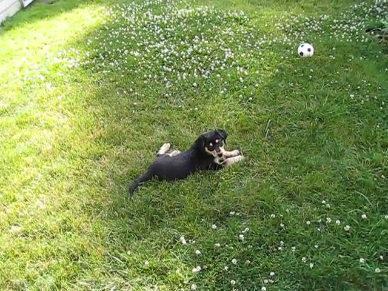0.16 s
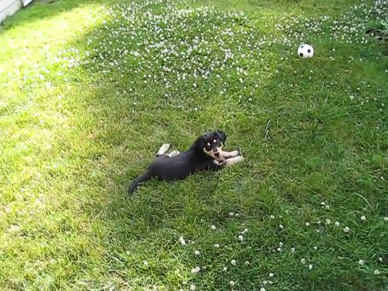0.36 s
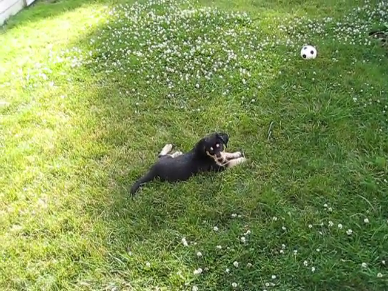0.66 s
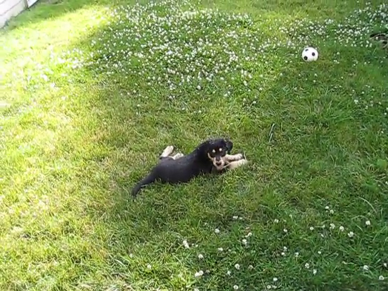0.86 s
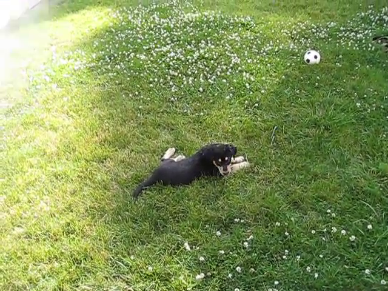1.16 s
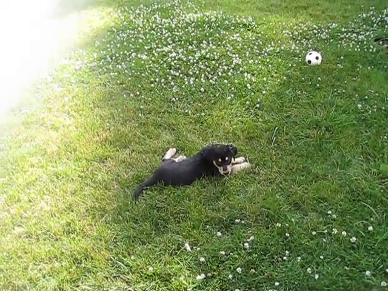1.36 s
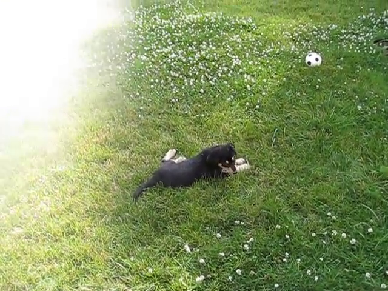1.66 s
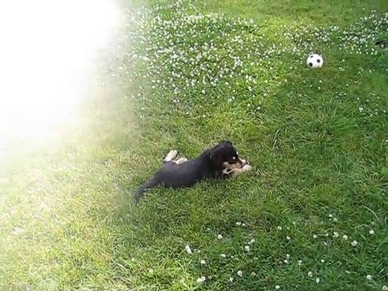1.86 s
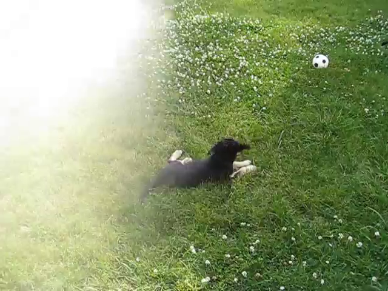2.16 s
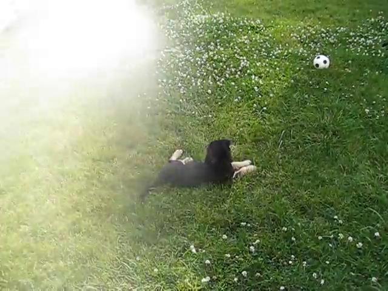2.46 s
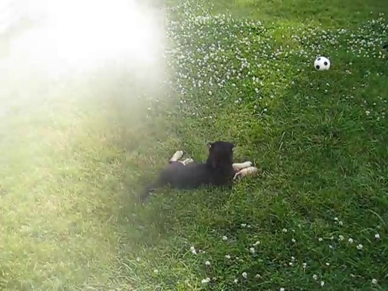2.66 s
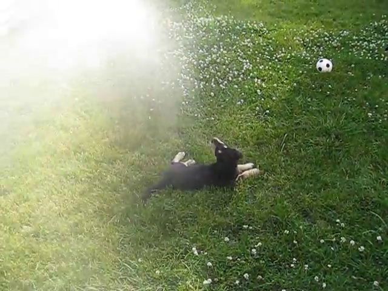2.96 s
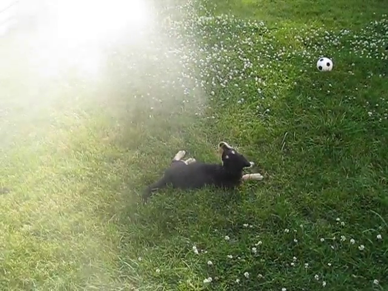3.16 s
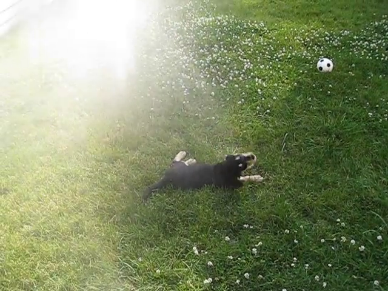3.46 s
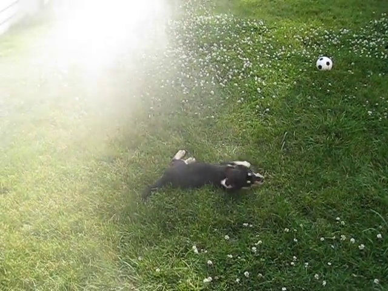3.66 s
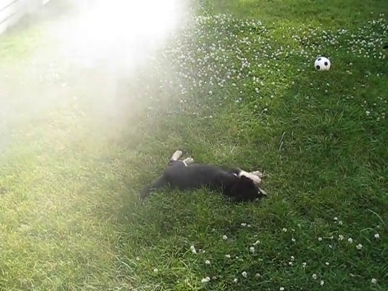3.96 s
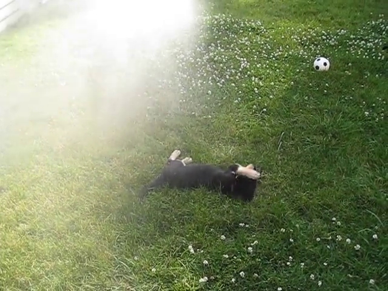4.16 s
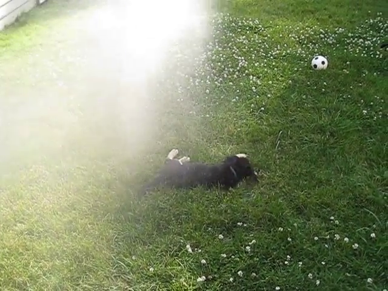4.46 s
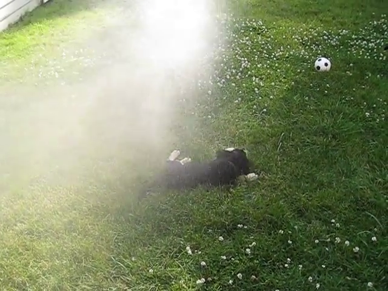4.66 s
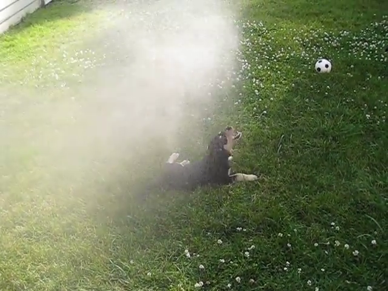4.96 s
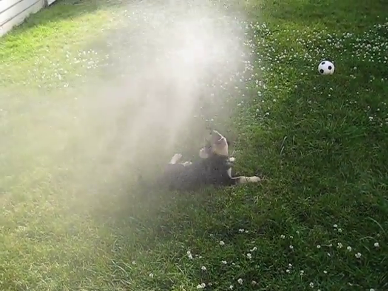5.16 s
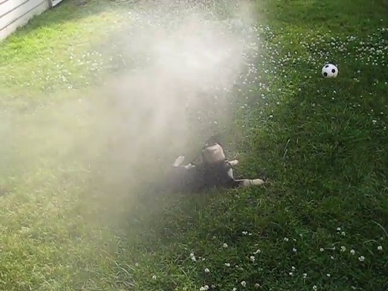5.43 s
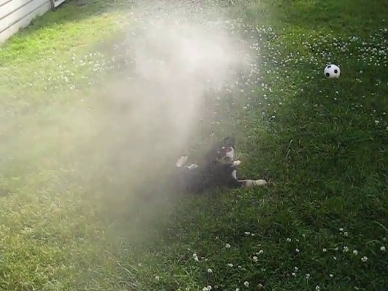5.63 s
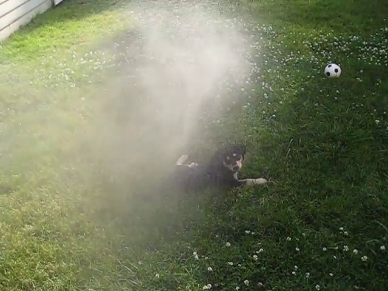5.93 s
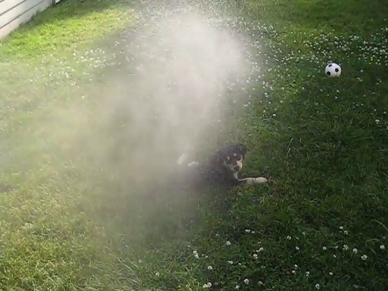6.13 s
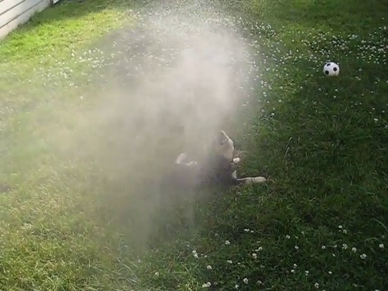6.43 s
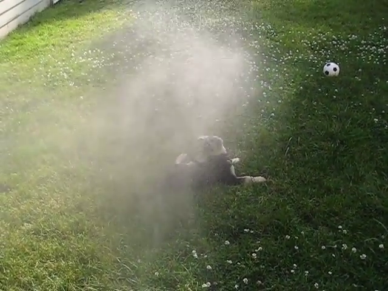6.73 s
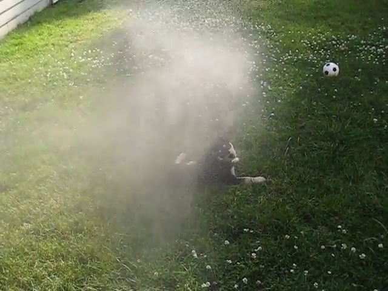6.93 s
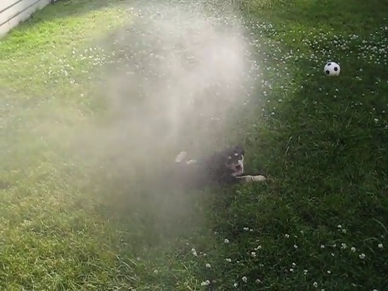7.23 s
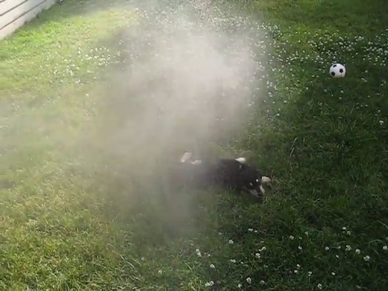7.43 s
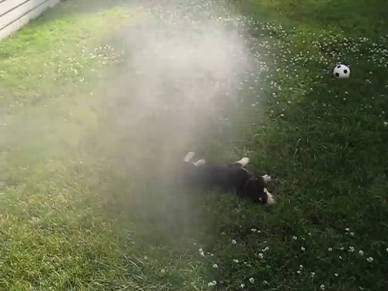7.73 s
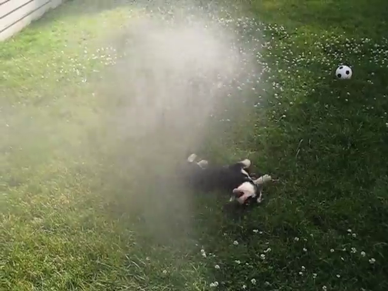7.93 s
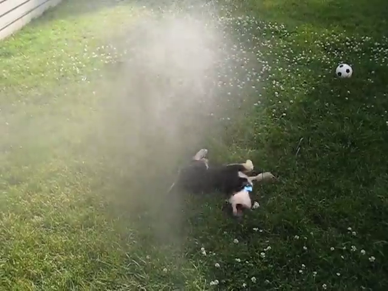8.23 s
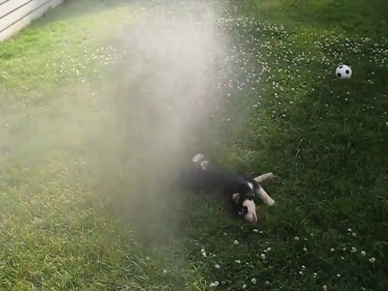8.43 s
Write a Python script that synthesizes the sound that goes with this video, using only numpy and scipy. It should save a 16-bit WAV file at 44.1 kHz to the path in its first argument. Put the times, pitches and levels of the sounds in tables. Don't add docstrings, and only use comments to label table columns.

```python
import sys
import numpy as np
from scipy import signal
from scipy.fft import rfft, irfft
from scipy.io import wavfile

SR = 44100
rng = np.random.default_rng(int(sys.argv[2]) if len(sys.argv) > 2 else 0)


def field_ratio(decibels):
    return 10 ** (np.asarray(decibels, dtype=float) / 20)


def waveform_to_disk(signal):
    frames = np.transpose(np.atleast_2d(signal))
    scaled = np.clip(frames, -1, 1) * 32767
    samples = np.round(scaled).astype(np.int16)
    wavfile.write(sys.argv[1], SR, samples)


N = 378819


def curves(rows):
    s, *columns = np.transpose(rows)
    return [np.interp(np.arange(N) / SR, s, column) for column in columns]


def rms_one(x):
    return x / np.sqrt(np.mean(x ** 2) + 1e-20)


def drift(rate_hz):
    r = np.exp(-80 * np.pi * rate_hz / SR)
    settle = 2000
    noise = rng.standard_normal(N // 40 + settle + 2)
    slow = signal.lfilter([1], [1, -2 * r, r * r], noise)[settle:]
    return np.interp(np.arange(N) / 40, np.arange(len(slow)), rms_one(slow))


def resonate(x, hz, width_hz):
    r = np.exp(-np.pi * width_hz / SR)
    section = [1 - r * r, 0, r * r - 1, 1, -2 * r * np.cos(2 * np.pi * hz / SR), r * r]
    return signal.sosfilt([section, section, section], x)


def jet():
    # t/s, bearing (0 far aside - 3 straight ahead), nearness/dB
    swing = [(0, .01, 1.5), (.3, .1, 1.5), (.8, 0.8, 2.0), (1.3, 1.8, 0.5), (1.8, 2.28, 0.3),
             (2.2, 2.36, 0.5), (3, 2.32, .5), (3.8, 2.47, 0.7), (4.4, 2.83, 0.1), (5.2, 2.9, 0.4),
             (6.4, 2.9, 0.44), (6.8, 2.98, 0.05), (7.6, 2.73, 0.6), (8.6, 2.85, 1.0)]
    # f/Hz, width/Hz, rms level/dB at bearing 0, 1, 2, 3
    resonances = [(266, 506, -57.5, -56.5, -56, -54), (636, 630, -51.7, -53, -50, -50),
                  (1023.5, 384, -42.5, -44, -40, -39), (1501, 537, -37.5, -38, -36, -34),
                  (1826, 600, -46, -45.5, -41.5, -42.5), (2405, 410, -44, -44.5, -41.5, -40.5),
                  (2760, 770, -42.5, -39, -37, -36.5), (3149, 800, -41, -38.5, -36, -33),
                  (3707, 1190, -42, -42, -38, -34), (4324, 740, -47, -40, -37.5, -38.5),
                  (4670, 1600, -38, -40, -45.5, -51), (5050, 750, -48, -43, -37, -35.0),
                  (5350, 460, -50, -42.5, -39.5, -43), (5640, 740, -44, -55, -50, -55.5),
                  (6290, 1000, -58.1, -55, -52.5, -48.5), (6764, 1010, -46, -45, -40.5, -35.5),
            (7380, 1220, -62.2, -48, -41, -34.5), (7790, 920, -52, -49, -42.5, -44.5),
            (8250, 1120, -53, -57, -48.5, -37.5), (8875, 1100, -62, -46, -43.5, -39.5),
            (9500, 1200, -51.4, -61, -58, -55), (10160, 1000, -53, -56, -58.5, -43.5),
            (10840, 1500, -60, -54, -49.5, -42), (11620, 1280, -62, -63, -56, -40.5),
            (12450, 1500, -57.3, -61.3, -59, -43), (13200, 1280, -57.2, -57, -53.7, -43.5),
            (13670, 1280, -57.1, -60, -57, -46), (14220, 1110, -58.1, -59.1, -60, -42),
            (15110, 1280, -60.9, -60.0, -61, -49.0), (15680, 1280, -60.8, -58.4, -59.0, -49.3),
                  (1439, 180, -48, -45, -45.5, -43.5)]
    bass_up_to_hz, bass_sway_db = 1200, 0.95
    bearing, near_db = curves(swing)
    gust, sway = drift(16.0), drift(.8)
    out = np.zeros(N)
    for hz, width_hz, *levels_db in resonances:
        level_db = np.interp(bearing, range(4), levels_db)
        level_db += bass_sway_db * sway * (hz < bass_up_to_hz)
        level_db += .2 * gust + .2 * drift(8.0)
        out += field_ratio(level_db) * rms_one(resonate(rng.standard_normal(N), hz, width_hz))
    return field_ratio(near_db) * out


def pump():
    # shaft multiple, rms level/dB
    multiples = [(2.0, -69), (4, -66), (5, -71), (6, -63.5), (9, -70), (10.0, -69), (11, -67), (12, -74),
                 (15, -55.5), (18, -52), (20.0, -58.5), (23, -55.5), (32, -56.5), (34, -52.3), (35, -60),
                 (36, -56.3)]
    # f/Hz, rms level/dB
    fan = [(83.4, -71), (126.5, -66), (2064.5, -64)]
    shaft_hz = 58.5
    rumble_hz, rumble_db = (45, 260), -58.5
    throb_db = 2.5 * drift(3.5)
    t = np.arange(N) / SR
    out = np.zeros(N)
    for hz, level_db in [(k * shaft_hz, db) for k, db in multiples] + fan:
        phase = 2 * np.pi * (hz * t + rng.random()) + .4 * drift(1.2)
        waver_db = 1.2 * drift(1.5) + throb_db * (200 < hz < 400)
        out += np.sqrt(2) * field_ratio(level_db + waver_db) * np.sin(phase)
    band = signal.butter(2, rumble_hz, "band", fs=SR, output="sos")
    rumble = signal.sosfilt(band, rng.standard_normal(N))
    return out + field_ratio(rumble_db) * rms_one(rumble)


def ticks_and_knocks():
    # t/s, gap down to up pulse/ms, ticks in the run
    ticks = [(.2085, 5.7, 1), (.4049, 11, 1), (.5003, 6.5, 1), (.978, 17.8, 1), (1.1483, 7.1, 1),
             (1.3112, 7.4, 1), (1.6202, 8, 1), (1.79, 43, 1), (2.066, 15, 2), (2.3897, 11.7, 1),
             (2.6298, 26.3, 1), (3.1465, 9.5, 1), (3.491, 29.6, 1), (3.9121, 7, 2), (4.0611, 5.3, 1),
             (4.4988, 33.7, 1), (4.8299, 9.9, 1), (4.866, 46, 1), (5.357, 11.1, 1), (5.4491, 18.6, 1),
             (6.0666, 17.6, 1), (6.2625, 7, 3), (6.8137, 17.2, 1), (6.9255, 8.5, 4), (7.2222, 10.9, 1),
             (7.3769, 6.5, 1), (7.445, 13.3, 1), (7.8557, 34.5, 1), (8.0686, 17.6, 1), (8.5678, 8.5, 1)]
    # t/s, peak level/dB, f/Hz, t60/s
    knocks = [
        (5.9305, -29, 440, .024),
        (5.9315, -26, 630, .028),
        (4.978, -31, 500, .018),
    ]
    tick_db, tick_width_s, run_step_s = -39, 0.0005, .038
    pulses = np.zeros(N)
    for start_s, first_gap_ms, count in ticks:
        for k in range(count):
            s = start_s + k * run_step_s * rng.uniform(.85, 1.15)
            gap_ms = first_gap_ms * (rng.uniform(.6, 1.2) if k else 1)
            pulses[int(s * SR)] = -field_ratio(tick_db)
            pulses[int((s + gap_ms / 1000) * SR)] = field_ratio(tick_db)
    pulse_time = np.arange(-60, 61) / SR / tick_width_s
    out = np.convolve(pulses, np.exp(-pulse_time ** 2 / 2), "same")
    t = np.arange(1000) / SR
    for s, peak_db, hz, t60_s in knocks:
        envelope = field_ratio(peak_db - 60 * t / t60_s) * np.minimum(t / .002, 1)
        out[round(s * SR):][:len(t)] += envelope * np.sin(2 * np.pi * hz * t)
    return out


def partings(dry):
    # centre t/s, low f/Hz, high f/Hz
    bursts = [(.2538, 5580, 7000), (.2538, 8200, 9690), (.3931, 14400, 15750), (.5092, 5580, 7000),
              (.5092, 7500, 9040), (.7878, 5080, 7000), (1.6702, 10250, 11800), (1.9024, 13720, 15220),
              (2.2042, 12360, 14560), (2.2275, 6800, 8380), (2.2275, 8880, 11100), (3.2491, 10250, 12500),
              (3.3885, 11630, 13890), (3.76, 10950, 13890), (3.969, 8890, 10440), (4.8513, 5600, 7710),
              (5.13, 14400, 15750), (6.7554, 13690, 15240), (6.8715, 12300, 14580), (7.1269, 4120, 5810),
              (7.8235, 8200, 9790), (7.8235, 12330, 13860), (7.8467, 5620, 7000), (7.8467, 8890, 11800),
              (7.8467, 13000, 15240)]
    size, parting_db = 2048, -2
    side = np.zeros(N)
    swell = np.sin(np.pi * np.arange(size) / size) ** 2.6
    hz = np.fft.rfftfreq(size, 1 / SR)
    for s, low_hz, high_hz in bursts:
        at = round(s * SR) - size // 2 + np.arange(size)
        band = (hz > low_hz) * (hz < high_hz)
        level = np.std(irfft(rfft(dry[0, at]) * band))
        noise = rms_one(irfft(rfft(rng.standard_normal(size)) * band))
        side[at] += field_ratio(parting_db) * level * swell * noise
    return side * [[1], [-1]]


def chip(s, length_s, hz, glide_hz_per_s, level_db):
    t = np.arange(-length_s * SR / 2, length_s * SR / 2) / SR
    return s - length_s / 2, hz + glide_hz_per_s * t, field_ratio(level_db) * np.cos(np.pi * t / length_s)


def arch(s, top_hz, width_s, level_db, loss_db):
    foot_hz, throat_hz, throat_width_hz, throat_loss_db = 2300, 2690, 250, 6
    lead, tail, fade_db = 1.75, 4.1, .2
    x = np.arange(-lead * width_s * SR, tail * width_s * SR) / SR / width_s
    rise_and_fall = np.where(x < 0, np.exp(-x ** 2 / 2), 1 / np.cosh(x))
    hz = foot_hz + (top_hz - foot_hz) * rise_and_fall
    off_throat = np.minimum(((hz - throat_hz) / throat_width_hz) ** 2, 1.7)
    db = level_db - throat_loss_db * off_throat
    db -= loss_db * np.clip(x + .5, 0, 1) + fade_db * np.maximum(x, 0)
    return s - lead * width_s, hz, field_ratio(db) * signal.windows.tukey(len(x), .15)


def birds():
    # centre t/s, length/s, f/Hz, glide/(Hz/s), rms level/dB
    chips = [(2.143, .026, 2770, 5000, -37), (2.167, .026, 3400, -5600, -35),
             (2.221, .068, 2800, -13000, -34.5), (2.697, .028, 2690, 2500, -33),
             (2.73, .028, 2720, 1500, -36), (2.875, .04, 2680, -3000, -36), (3.94, .03, 2670, -2700, -32),
             (4.116, .028, 2660, -3000, -30), (4.147, .045, 2625, -900, -34), (3.252, .04, 2390, 1500, -40),
             (4.488, .085, 2480, -3200, -39)]
    # top t/s, top f/Hz, width/s, rms level/dB, loss after the top/dB
    arches = [
        (3.316, 3010, .031, -31, 3),
        (4.588, 2895, .034, -30.5, 7),
    ]
    flutter_db, waver = 1.6 * drift(60.0), .007 * drift(70.0)
    out = np.zeros(N)
    for s, hz, strength in [arch(*row) for row in arches] + [chip(*row) for row in chips]:
        at = round(s * SR) + np.arange(len(hz))
        phase = 2 * np.pi * np.cumsum(hz * (1 + waver[at])) / SR
        out[at] += np.sqrt(2) * strength * np.sin(phase)
    echo = field_ratio(-13) * np.roll(out, round(.021 * SR))
    return field_ratio(flutter_db + 4) * out + echo


def scene():
    return np.tile(jet() + pump() + birds() + ticks_and_knocks(), (2, 1))


def roll_off(x):
    return signal.sosfilt(signal.butter(12, 15760, fs=SR, output="sos"), x)


def record(dry):
    return roll_off(dry + partings(dry))


dry = scene()
out = record(dry)
waveform_to_disk(out)
```